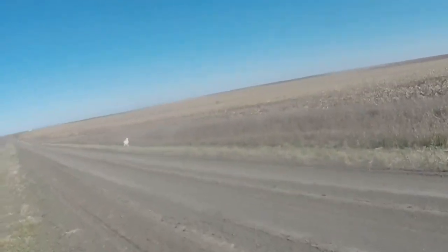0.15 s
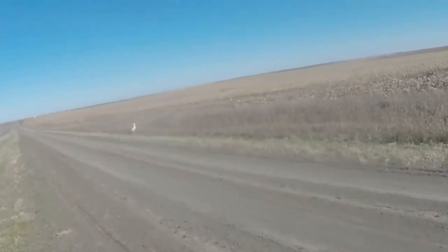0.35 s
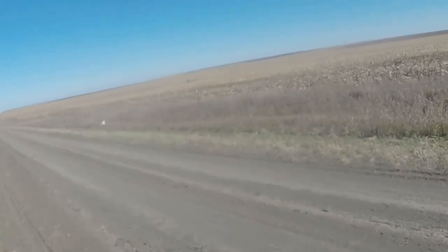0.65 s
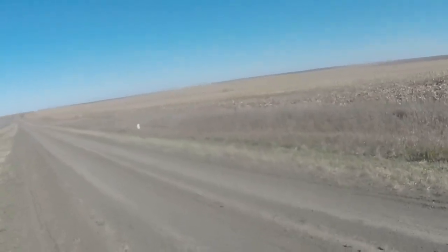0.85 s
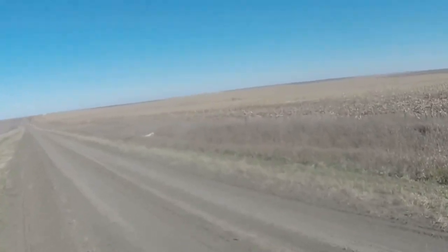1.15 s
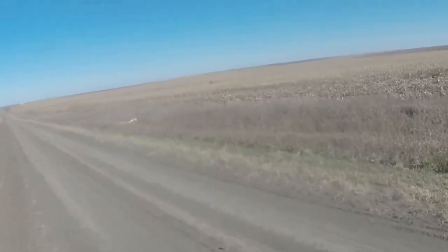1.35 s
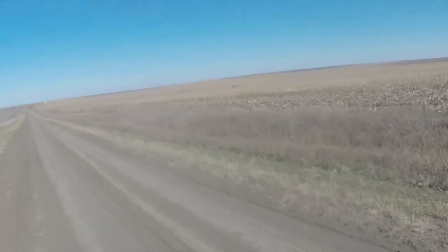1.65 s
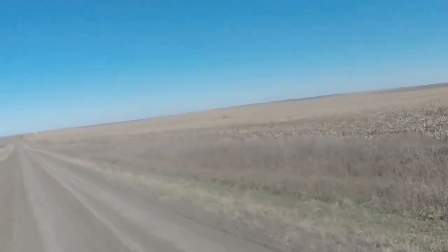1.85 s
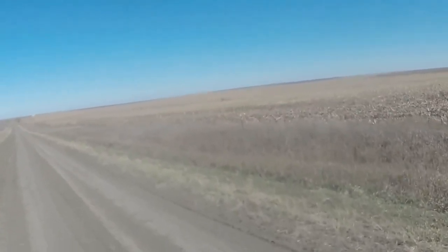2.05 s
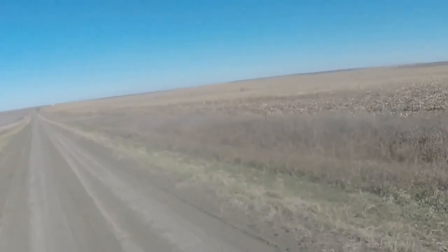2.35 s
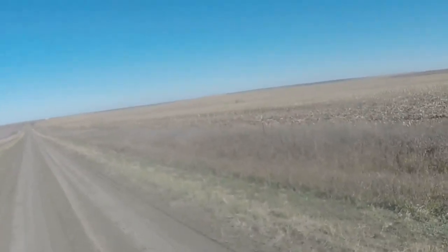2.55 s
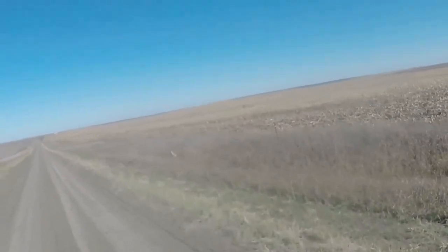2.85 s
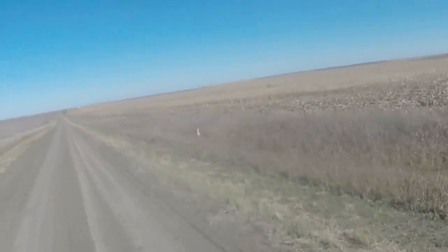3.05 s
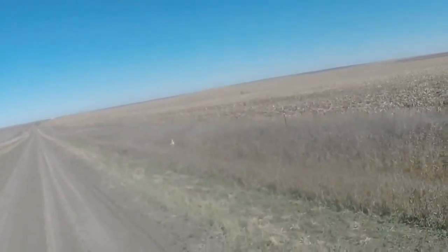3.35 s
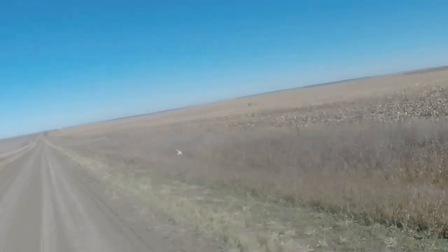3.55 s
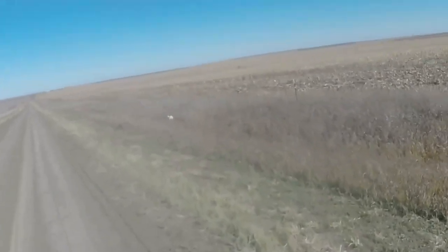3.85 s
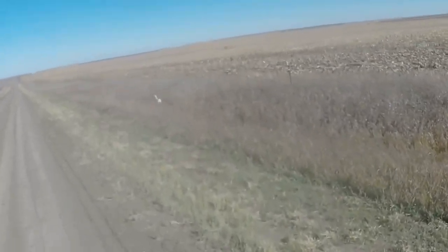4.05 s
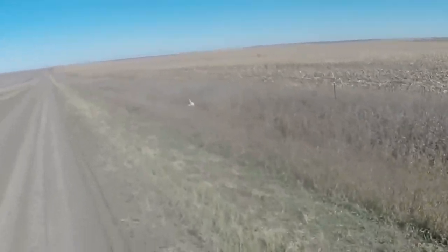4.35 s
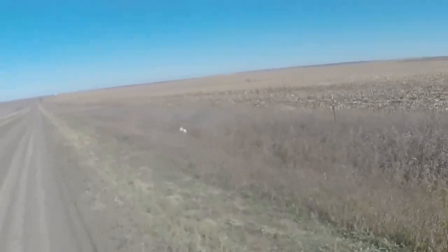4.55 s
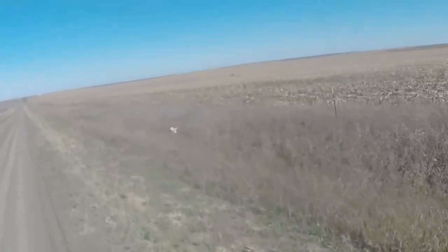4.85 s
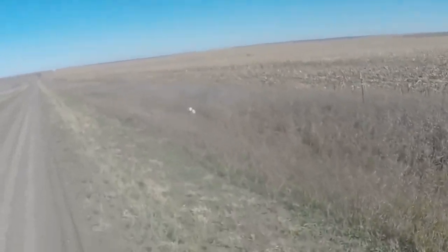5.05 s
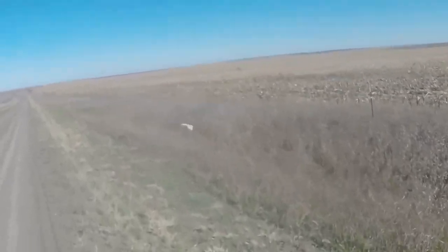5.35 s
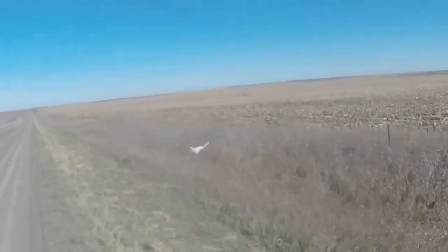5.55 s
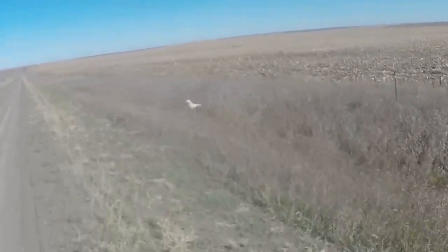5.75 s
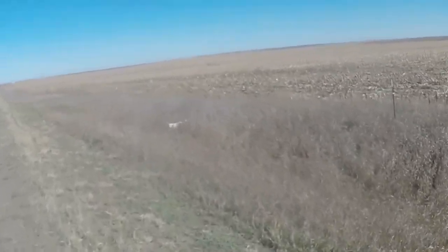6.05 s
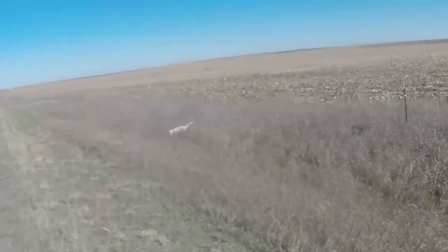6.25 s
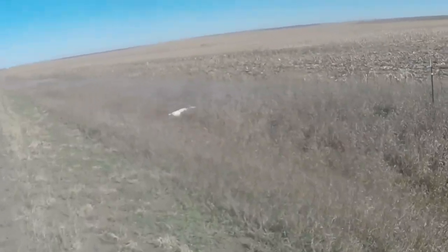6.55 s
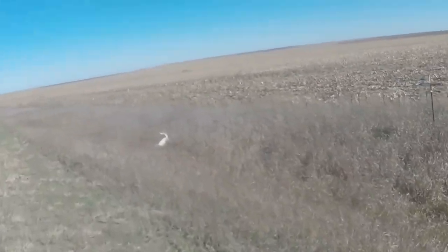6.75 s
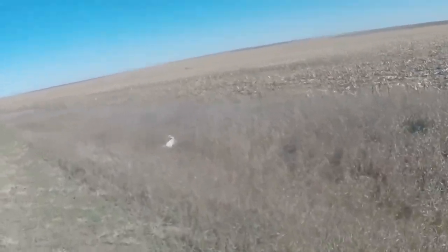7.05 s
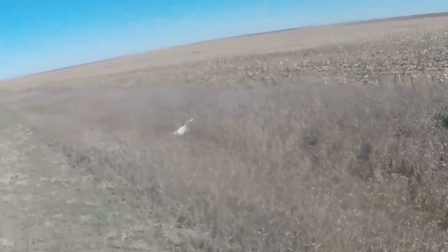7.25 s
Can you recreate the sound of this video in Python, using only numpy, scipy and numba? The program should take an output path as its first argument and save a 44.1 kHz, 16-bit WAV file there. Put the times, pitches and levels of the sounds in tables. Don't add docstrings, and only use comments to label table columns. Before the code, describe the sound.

Brisk footsteps thud and rattle a body-worn camera housing while dry grass swishes and snaps around the legs and wind buffets the microphone outdoors.

```python
import sys
import numpy as np
from scipy import signal
from scipy.io import wavfile
from scipy.ndimage import uniform_filter1d
from numba import njit

SR = 44100
rng = np.random.default_rng(int(sys.argv[2]) if len(sys.argv) > 2 else 0)


def volts_from_decibels(level):
    exponent = np.asarray(level, float) / 20
    return 10 ** exponent


def store_wav(level_fs):
    pcm = np.round(np.clip(np.atleast_2d(level_fs), -1, 1) * 32767)
    wavfile.write(sys.argv[1], SR, pcm.T.astype(np.int16))


N = 326797
TIME = np.arange(N) / SR
EDGE_HZ, EDGE_WIDTH_HZ, EDGE_SKIRT_HZ = 2350.0, 450.0, 670.0
LEAD_S = 0.0015


def unit(x):
    return x / np.sqrt(np.mean(x ** 2))


def top(x):
    return x / np.abs(x).max()


@njit
def svf(x, hz, width):
    y, b, l = np.empty(len(x)), 0., 0.
    for i in range(len(x)):
        g, k = np.tan(np.pi * hz[i] / SR), width / hz[i]
        v = (b + g * (x[i] - l)) / (1 + g * (g + k))
        b, l, y[i] = 2 * v - b, l + 2 * g * v, k * v
    return y


def band(x, hz, width_hz):
    return svf(x, np.clip(hz + np.zeros(len(x)), 5, 0.45 * SR), 1.0 * width_hz)


def steep(x, hz, width_hz, skirt_hz):
    return top(band(band(x, hz, width_hz), hz, skirt_hz))


def modes(x, table):
    out = 0
    for k, (hz, width_hz, db) in enumerate(table):
        out = out + (-1) ** k * volts_from_decibels(db) * band(x, hz, width_hz)
    return out


def walk(rate):
    hold = max(int(SR / rate), 2)
    steps = np.repeat(rng.standard_normal(N // hold + 1), hold)
    return unit(uniform_filter1d(uniform_filter1d(steps, hold), hold)[:N])


def curves(table):
    s, *columns = np.transpose(table)
    return [np.interp(TIME, s, c) for c in columns]


def swell(s, half_s):
    return np.exp(-0.5 * ((TIME - s) / half_s) ** 2)


def bands(source, colour, lo_hz, hi_hz, flicker_db, rate):
    hz_axis, db_axis = np.transpose(colour)
    count = int(3 * np.log2(hi_hz / lo_hz)) + 1
    out = 0
    for hz in lo_hz * 2 ** (np.arange(count) / 3):
        db = np.interp(np.log(hz), np.log(hz_axis), db_axis) + 10 * np.log10(hz)
        narrow = unit(band(band(source(), hz, hz / 3), hz, hz / 3))
        out = out + volts_from_decibels(db + flicker_db * walk(rate)) * narrow
    return unit(out)


def add(track, s, sound):
    i = int(s * SR)
    a, b = max(i, 0), min(i + len(sound), N)
    track[a:b] += sound[a - i:b - i]


def burst(length_s, rise=0.19, count=4096):
    t = np.arange(count) / SR / max(length_s, 3e-4)
    return rng.standard_normal(count) * (1 - np.exp(-t / rise)) ** 2 * np.exp(-t)


def crackle(rate, spread_db):
    chance = rng.random((3, N))
    spreads = np.minimum(-np.log(1 - chance[0]), 4)
    sizes = volts_from_decibels(spread_db * spreads) * np.sign(chance[1] - 0.5)
    return (chance[2] < rate / SR) * sizes + 0.29 * rng.standard_normal(N)


# start_s, swish_db
SWISH = [(0.0, -39), (0.325, -43), (0.345, -37), (0.91, -37.5), (1.05, -33), (1.71, -39.5), (2.15, -34.5),
         (2.6, -37.5), (3.71, -35.5), (4.13, -37.5), (4.46, -37), (4.99, -43.5), (5.26, -43.5),
         (5.41, -39.5), (5.92, -36.5), (6.19, -35.5), (6.65, -38.5), (7.41, -36.5)]
# pitch_hz, level_db per Hz
GRASS_COLOUR = [(250, -34), (420, -5.5), (745, -8.5), (1120, -4), (1560, 4), (1760, 0.5), (2050, -2),
                (2380, -1), (2690, 0.5), (3920, -14.5), (5540, -19.5), (7730, -26.5), (12500, -31),
                (14600, -38.5), (15500, -45)]


def grass():
    def grains():
        return crackle(3000.0, 3.1)

    (swish_db,) = curves(SWISH)
    centre_hz = 2122 * (1 + 0.03 * walk(4.01))
    under = bands(grains, GRASS_COLOUR, 450, 920, flicker_db=2.0, rate=16.0)
    swish = bands(grains, GRASS_COLOUR, 1080, 3700, flicker_db=0.9, rate=14.0)
    drift = unit(band(band(grains(), centre_hz, 210.0), centre_hz, 610.0)) * volts_from_decibels(-6.0 + 1.7 * walk(8))
    high = bands(grains, GRASS_COLOUR, 4500, 15500, flicker_db=1.3, rate=30.0)
    port = unit(steep(grains(), 5700, 750, 1500.0))
    high = high + volts_from_decibels(-5.5) * port
    brush_db = swish_db - 2.28 + 1.5 * stride() + 0.79 * walk(12)
    far = volts_from_decibels(0.38 * brush_db - 32.0) * under
    near = volts_from_decibels(brush_db + 1.0) * (swish + drift)
    return far + near + volts_from_decibels(-43.0 + 0.33 * brush_db) * high


# start_s, buffet_db
WIND = [(0.0, -24.5), (1.19, -24), (2.1, -23.5), (2.31, -26.5), (3.05, -23.5), (3.26, -38), (3.46, -24.5),
        (4.0, -22), (4.89, -22.5), (5.06, -20), (5.32, -34), (5.51, -19.5), (5.84, -32.5), (6.05, -21.5),
        (6.23, -27.5), (6.97, -26), (7.2, -50), (7.41, -17)]
# pitch_hz, level_db per Hz
WIND_COLOUR = [(4.7, -31), (8.0, 3.5), (19, 6.5), (39, -5), (85, -15.5), (173, -21), (239, -17.5),
               (441, -34), (600, -33), (780, -63), (1320, -120)]
# start_s, rumble_db
HUM = [(0.0, -40.5), (1.19, -36), (1.96, -41), (2.13, -37), (2.58, -39), (4.31, -38), (4.42, -39),
       (4.89, -40.5), (5.06, -44), (5.28, -42.5), (5.41, -38.5), (5.82, -38), (7.08, -37.5), (7.41, -39)]


def wind():
    def air():
        return rng.standard_normal(N)

    (buffet_db,) = curves(WIND)
    (hum_db,) = curves(HUM)
    buffet = bands(air, WIND_COLOUR, 10.42, 60, flicker_db=0.37, rate=4.3)
    rumble = bands(air, WIND_COLOUR, 71.6, 400, flicker_db=2.26, rate=16.0)
    rumble_db = hum_db + 3.5 + 7 * stride() + 0.4 * walk(3.24)
    return volts_from_decibels(buffet_db) * buffet + volts_from_decibels(rumble_db) * rumble


# start_s, crest_db, sway_hz, half_length_s
JOLTS = [(0.129, -9.5, 30, 0.018), (0.503, -8, 26.4, 0.02), (0.868, -10.3, 25.1, 0.022),
         (1.242, -12.5, 29.7, 0.047), (1.554, -7, 22.4, 0.016), (1.913, -3.2, 20.9, 0.03),
         (2.246, -4.5, 26, 0.023), (2.584, -9, 23.7, 0.039), (2.938, -4, 24.4, 0.027),
         (3.293, -11.6, 22, 0.045), (3.635, -3.5, 20.4, 0.04), (3.964, -6, 19.8, 0.037),
         (4.292, -4, 22, 0.023), (4.624, -5, 22, 0.028), (4.965, -5, 27, 0.023), (5.314, -5, 22.7, 0.026),
         (5.683, -4.5, 18.2, 0.035), (6.019, -8.0, 31, 0.012), (6.368, -6, 22.3, 0.037),
         (6.773, -17.5, 30.7, 0.041), (7.09, -4.5, 20, 0.032)]


def jolts():
    out = 0
    for s, db, hz, half_s in JOLTS:
        turn = 2 * np.pi * hz * (TIME - s)
        sway = np.cos(turn + 0.44 * np.cos(turn))
        out = out + volts_from_decibels(db) * swell(s + 0.003, half_s) * sway
    return out


def stride():
    return sum(np.sqrt(volts_from_decibels(db)) * swell(s, 0.05) for s, db, *_ in JOLTS)


# start_s, peak_db, dull_db, bright_db, length_ms
CRACKS = [(0.491, -28, -6, -18, 1.8), (2.128, -20.5, -5, -41, 2), (2.304, -19, 8.5, -29, 2),
          (2.4873, -25.5, -4, -15, 2.4), (2.499, -23.5, -18, -22, 2.2), (2.5636, -10.5, -12.5, -13, 3.5),
          (2.7178, -12, -10.5, -12, 2.2), (2.817, -22.5, -3, -33, 1.1), (3.49, -26, -3.5, -24, 1.4),
          (3.6135, -10, 10, -12, 1.45), (3.843, -24.5, -3.5, -34, 1), (3.9865, -14.5, -12, -11.5, 4.1),
          (4.6021, -20.5, -4, -12, 1.4), (4.609, -27, -3, -8, 2.5), (5.345, -35, -12, -5, 1.5),
          (5.34, -21, -10, -8.5, 1.5), (5.854, -32, -20, -6, 3), (5.885, -24, -26, -35, 0.98),
          (5.935, -27, -4, -12, 3.6), (6.385, -22.5, -22, -13, 1.8), (6.435, -29, -21, -26, 0.83),
          (6.765, -28.5, -11, -3.5, 2.7), (6.8406, -9.5, -15.5, -13, 3), (7.039, -13.5, -12, -16, 1.9),
          (7.062, -17.5, -2, -34, 3), (7.391, -30.5, -2, -5, 1.2)]
# start_s, peak_db, ring_hz, bright_db
TICKS = [(0.143, -35, 4870, -29), (0.429, -32, 4200, -25), (0.5167, -24, 6600, -39),
         (0.573, -27, 5140, -31), (1.436, -29.5, 4470, -28), (1.524, -35, 4260, -19),
         (1.879, -32.5, 5600, -38), (2.435, -29, 4840, -24), (2.446, -28, 5400, -20),
         (2.683, -31, 4260, -13), (2.699, -27, 4930, -15), (2.455, -39, 7040, -12), (2.885, -30, 4290, -19),
         (2.908, -42, 8500, -20), (2.928, -44, 8750, -15), (2.9507, -37, 7250, -25), (3.668, -29, 4440, -8),
         (3.7339, -33, 5530, -12), (3.7993, -32, 6900, -29), (3.8217, -30, 4730, -22),
         (3.9337, -29, 6100, -26), (4.021, -30, 4800, -10), (4.3072, -33, 6900, -34),
         (4.593, -30, 7650, -28), (4.63, -34, 4530, -8), (4.821, -26.5, 4700, -14), (4.828, -33, 5500, -15),
         (4.835, -30.5, 5370, -32), (5.171, -27.5, 5100, -30), (5.549, -28, 4530, -26),
         (5.649, -33.5, 5660, -6), (6.285, -33, 4430, -8), (7.1182, -26.5, 6700, -38)]
# start_s, peak_db, ring_hz
FAINT_TICKS = [(0.23, -39, 6460), (0.463, -47, 13000), (0.96, -32, 5200), (1.564, -35, 6840), (2.252, -41, 6000),
               (2.2794, -42, 8000), (1.3818, -47, 9500), (2.183, -38, 5330), (3.548, -38, 5500),
               (3.593, -46, 9500), (3.958, -33, 5600), (5.945, -41, 10200), (6.51, -31, 4930),
               (2.978, -46, 10500), (4.65, -45, 11000), (4.188, -46, 10900), (4.659, -35, 9500),
               (4.684, -42, 10800), (5.706, -40, 8050), (5.7444, -32, 4710), (6.308, -29, 4680),
               (6.723, -37, 4520), (6.787, -36, 7500), (6.918, -34, 5200), (6.965, -31.5, 4800)]


def snaps():
    crack_ring_hz = 4800
    tick_dull_db, tick_ms, faint_bright_db = -5, 1.64, -14
    events = [(s, db, crack_ring_hz, dull_db, bright_db, ms) for s, db, dull_db, bright_db, ms in CRACKS]
    thin = list(TICKS) + [(*row, faint_bright_db) for row in FAINT_TICKS]
    events += [(s, db, hz, tick_dull_db, bright_db, tick_ms) for s, db, hz, bright_db in thin]
    out = np.zeros(N)
    for s, db, hz, dull_db, bright_db, ms in events:
        push = burst(0.0011 * ms)
        dull = steep(push, 2526.0, 410.0, 860.0)
        dull = dull + 0.5 * steep(push, 880.0, 830.0, 1250.0)
        dull = dull + 0.029 * steep(push, 1000.0, 230.0, 660.0)
        bright = steep(push, 8400.0, 6100.0, 10600.0)
        ring = steep(band(push, hz, 3800.0), hz, 3200.0, 3500.0)
        ring = ring + 0.014 * steep(push, 0.5 * hz, 1100.0, 2600.0)
        snap = ring + volts_from_decibels(dull_db + 1.5) * dull + volts_from_decibels(bright_db + 3.5) * bright
        add(out, s - LEAD_S, volts_from_decibels(db) * snap)
    return out


# start_s, peak_db, body_hz, shell_db, struck_spot_hz
LANDINGS = [(0.189, -10, 255, -22, 750), (0.561, -8.5, 240, -14, 570), (0.925, -14.5, 237, -19.5, 530),
            (1.244, -17.5, 222, -10, 700), (1.606, -12.5, 262, -14, 960), (1.924, -10, 217, -16, 540),
            (2.269, -13.5, 178, -18.5, 522), (2.614, -30, 295, -7.5, 730), (2.963, -20, 215, -15, 560),
            (3.29, -8, 227, -22, 925), (3.635, -11.5, 234, -15, 624), (3.964, -16.5, 232, -13, 608),
            (4.29, -20, 260, -10, 525), (4.621, -11.5, 239, -15, 566), (4.975, -21, 191, -14.5, 1020),
            (5.317, -7.5, 211, -15, 1040), (5.692, -12, 161, -11.5, 700), (6.033, -10.5, 203, -14.5, 710),
            (6.379, -16, 212, -14, 770), (6.743, -11, 224, -15.5, 1040), (7.101, -11, 181, -15.5, 630)]
# start_s, peak_db, body_hz, shell_db
REBOUNDS = [(0.548, -27, 226, -15), (1.593, -28, 230, -23), (1.641, -21, 250, -27), (3.315, -23, 230, -10),
            (2.276, -25, 172, -13), (2.317, -23, 262, -44), (3.602, -24.5, 202, -10),
            (3.612, -23, 203, 1.5), (3.687, -16.5, 173, -16.5), (3.73, -26.5, 256, -9),
            (3.788, -24.5, 188, -10), (4.322, -20.5, 236, -12.5), (4.389, -22, 260, -30),
            (4.671, -19.5, 227, -32), (5.351, -21.5, 234, -13), (5.723, -18, 285, -13.5),
            (6.423, -15.5, 247, -25), (7.032, -25.5, 272, -12), (7.139, -16, 217, -37)]
# pitch_hz, width_hz, level_db
SHELL = [(530, 130, -5), (990, 1440, 11), (1303, 74, 12), (2030, 780, -50)]


def knocks():
    contact_s, chatter_s = 0.0034, 0.004
    tap_at_s, tap_s = 0.00503, 0.00112
    rebound_spot_hz, rebound_thud_db = 620, -9.5
    contacts = [(*row, 0) for row in LANDINGS]
    contacts += [(*row, rebound_spot_hz, rebound_thud_db) for row in REBOUNDS]
    jolt_s, jolt_db = np.transpose(JOLTS)[:2]
    out = np.zeros(N)
    for s, db, hz, shell_db, spot_hz, soft_db in contacts:
        thud_db = -6.5 + soft_db + 2.5 * jolt_db[np.argmin(np.abs(jolt_s - s))]
        push = burst(contact_s, rise=0.95) + volts_from_decibels(-26.5) * burst(0.014, rise=0.19)
        push = np.roll(push, int(chatter_s * SR)) + volts_from_decibels(-11) * burst(0.5 * contact_s, rise=1.0)
        push = uniform_filter1d(push, size=7)
        tap = np.exp(-0.5 * ((np.arange(len(push)) / SR - tap_at_s) / tap_s) ** 2)
        struck = top(band(tap, hz, 470.0)) + 1.1 * top(band(push, hz, 370.0))
        body = steep(struck, hz, 48.6, 188.0)
        whole_shell = top(band(modes(push, SHELL), 460.0, 3400.0))
        spot = steep(push, spot_hz, 450.0, 1500.0)
        shell = volts_from_decibels(shell_db + 13) * (0.38 * whole_shell + 0.95 * spot)
        edge = volts_from_decibels(shell_db + 1.0) * steep(push, EDGE_HZ, EDGE_WIDTH_HZ, EDGE_SKIRT_HZ)
        thud = volts_from_decibels(thud_db) * steep(push, 92.0, 45.0, 73.0)
        add(out, s - chatter_s - LEAD_S, volts_from_decibels(db) * (body + shell + edge) + thud)
    return out


# start_s, level_db, pitch_hz, width_hz, half_length_s
TUFTS = [(0.367, -43, 3200, 1600, 0.016), (3.533, -42, 3000, 900, 0.055), (1.22, -39, 2600, 1500, 0.026),
         (1.065, -39, 2550, 1680, 0.097), (1.412, -37.5, 2730, 700, 0.023), (1.536, -39, 2170, 890, 0.061),
         (1.937, -43, 2110, 700, 0.037), (2.886, -35.5, 2190, 714, 0.077), (4.162, -36.5, 1656, 220, 0.031),
         (5.744, -43, 2320, 700, 0.031), (6.303, -34, 2820, 400, 0.012), (6.92, -42.5, 1670, 300, 0.046)]


def tufts():
    grains = crackle(3000.0, 1.1)
    out = 0
    for s, db, hz, width_hz, half_s in TUFTS:
        narrow = steep(grains, hz, width_hz, 2 * width_hz)
        brush = unit(steep(narrow, hz, 2 * width_hz, 2 * width_hz))
        out = out + volts_from_decibels(db) * swell(s, half_s) * brush
    return out


# start_s, peak_db
EDGE_HITS = [(0.572, -27), (1.925, -31), (3.29, -32), (3.966, -29), (4.624, -22), (5.32, -26), (5.695, -24),
             (6.035, -34), (6.382, -29), (6.744, -36), (7.105, -32)]


def edges():
    out = np.zeros(N)
    for s, db in EDGE_HITS:
        ring = steep(burst(0.0048, rise=1.0), EDGE_HZ, EDGE_WIDTH_HZ, EDGE_SKIRT_HZ)
        add(out, s - LEAD_S, volts_from_decibels(db) * ring)
    return out


# release_s, drag_s, level_db, bright_db, squeal_db
SCRAPES = [
    (2.558, 0.16, -27.5, -11, -4),
    (2.569, 0.025, -21, -14, -6),
    (6.803, 0.008, -28, -8, 3),
    (6.811, 0.012, -22, -11, 2),
    (6.816, 0.008, -28, -8, 3),
    (6.822, 0.07, -31.5, -13, 4),
    (6.835, 0.05, -40, -9, 5),
    (6.84, 0.0066, -18, -8, 9),
    (7.064, 0.029, -18.5, -13, -14),
    (4.67, 0.055, -44, -3, -20),
]
# pitch_hz, width_hz, level_db
SQUEAL = [(2990, 140, 0.5), (4960, 100, 6), (8000, 86, -2), (9420, 370, -4.5), (12700, 250, -15)]


def scrapes():
    slip = crackle(4000.0, 1.8) * volts_from_decibels(4.0 * walk(220))
    low = unit(steep(slip, 5000.0, 3500.0, 5000.0))
    high = unit(steep(slip, 13000.0, 5600.0, 8000.0))
    squeal = unit(modes(slip, SQUEAL))
    out = 0
    for s, drag_s, db, bright_db, squeal_db in SCRAPES:
        t = TIME - s
        fall_db = np.maximum(-23 * t / drag_s, 1500 * t)
        friction = low + volts_from_decibels(bright_db) * high + volts_from_decibels(squeal_db) * squeal
        out = out + volts_from_decibels(db - 9.0 - fall_db) * friction
    return out


# start_s, level_db, half_length_s
SLAM = (3.607, -3.5, .004)


def slam():
    s, db, half_s = SLAM
    return -volts_from_decibels(db) * swell(s, half_s)


def scene():
    plants = grass() + snaps() + tufts() + scrapes()
    housing = jolts() + knocks() + edges() + slam()
    return (plants + wind() + housing)[None]


def roll_off(x):
    return signal.sosfilt(signal.butter(12, 15620, fs=SR, output="sos"), x)


# pitch_hz, width_hz, level_db
HOUSING = [(2755, 202, -9), (2964, 118, -12), (4980, 180, -13.5), (4230, 200, -20)]


def record(dry):
    housed = dry + modes(dry[0], HOUSING)
    lowpass = signal.ellip(8, 0.5, 50, 15300.0, fs=SR, output="sos")
    capsule = signal.sosfilt(lowpass, housed)
    return roll_off(np.clip(capsule, -1, 1))


dry = scene()
out = record(dry)
store_wav(out)
```